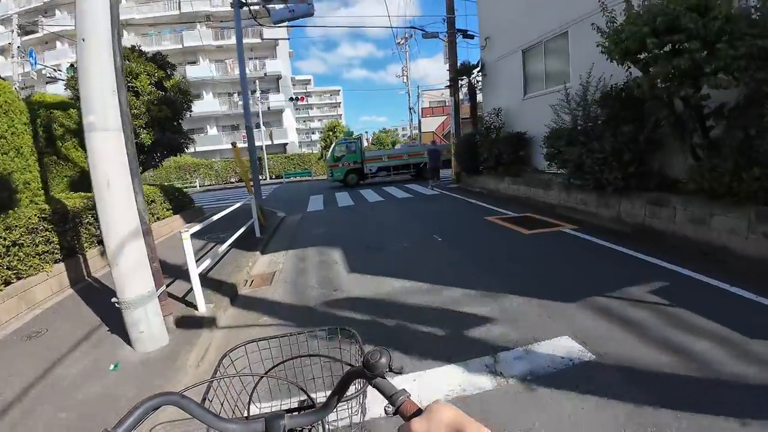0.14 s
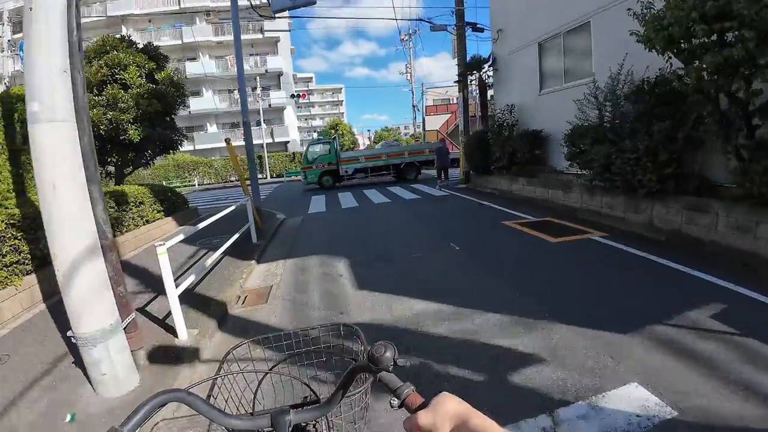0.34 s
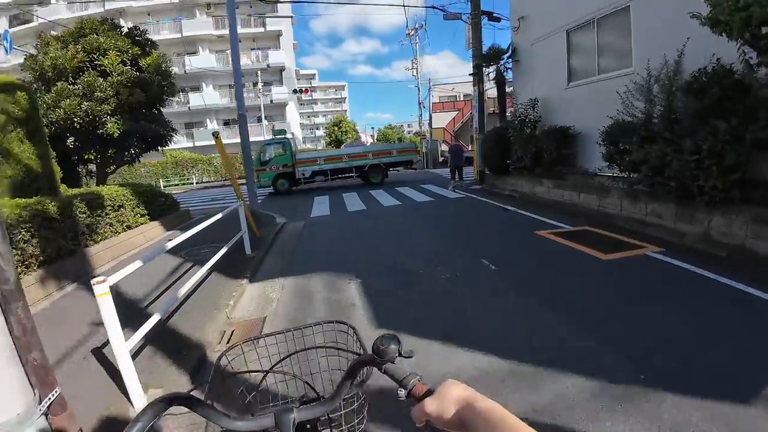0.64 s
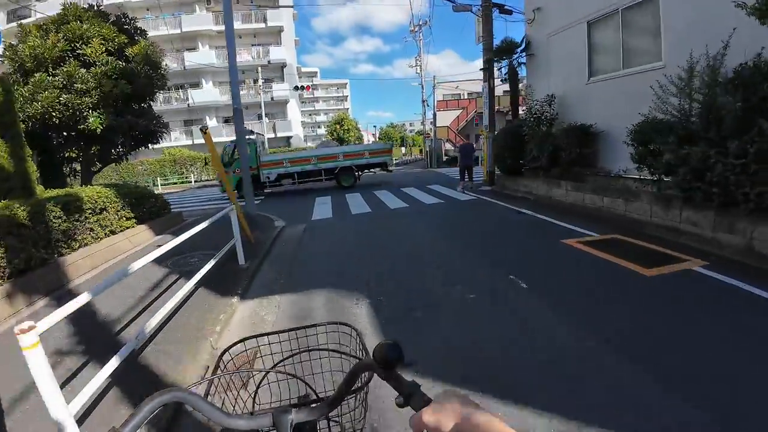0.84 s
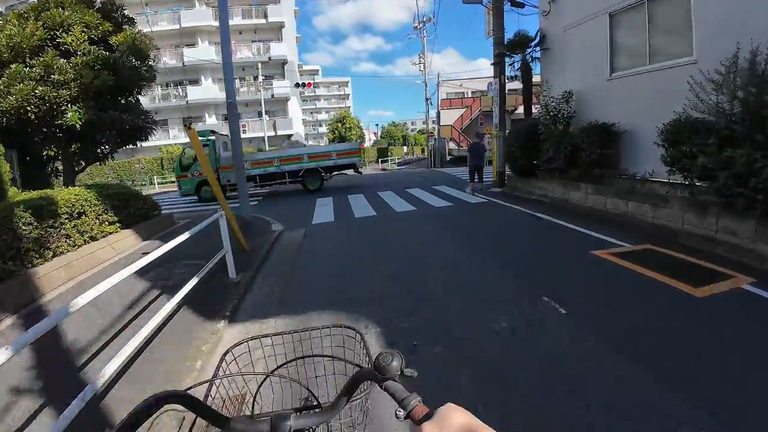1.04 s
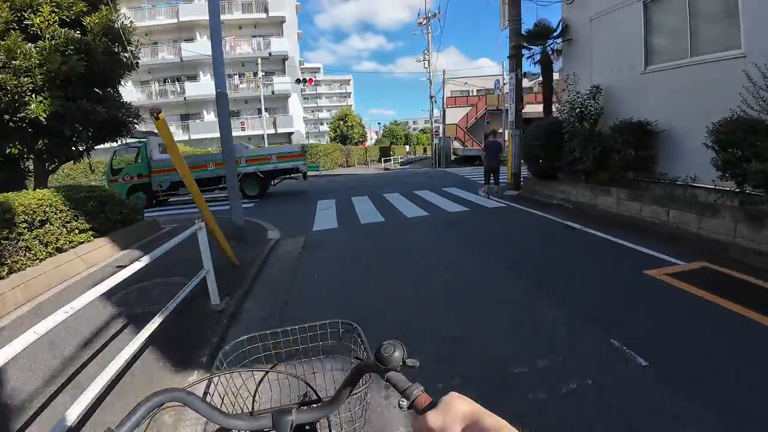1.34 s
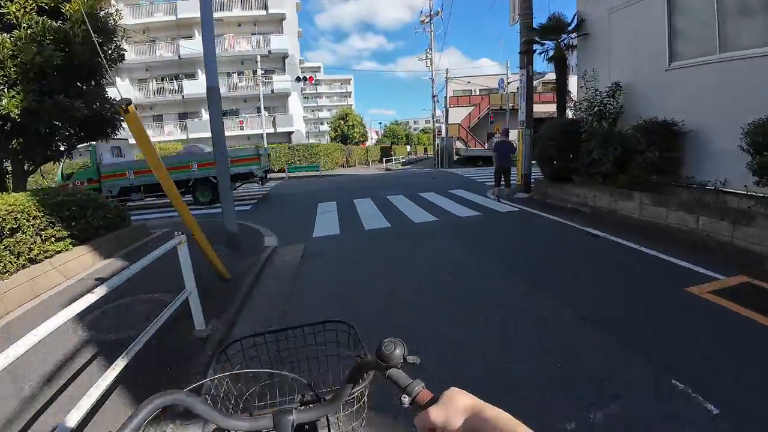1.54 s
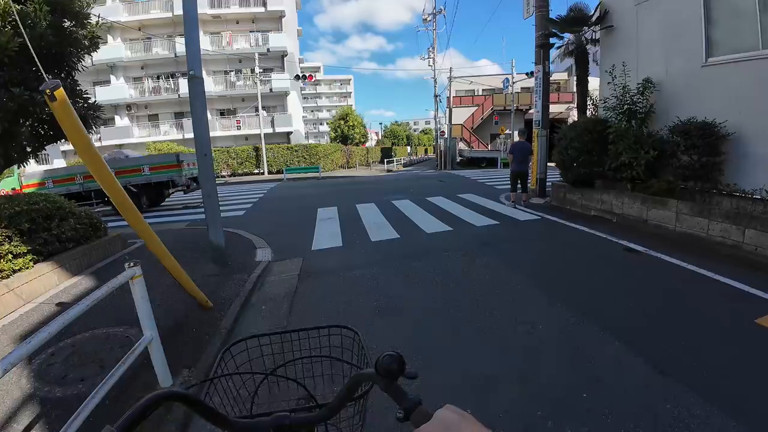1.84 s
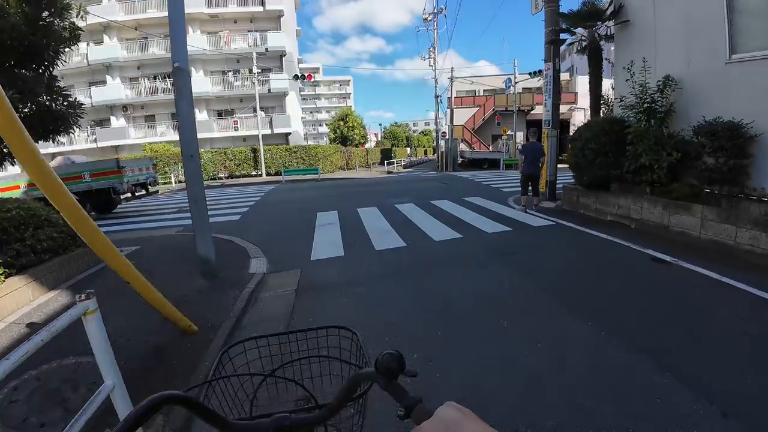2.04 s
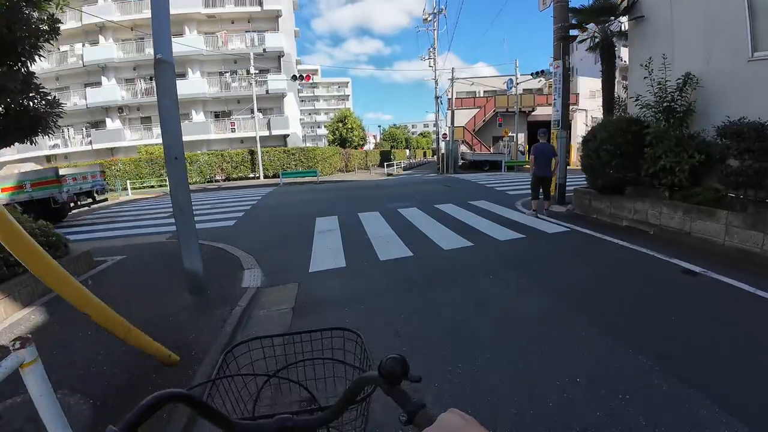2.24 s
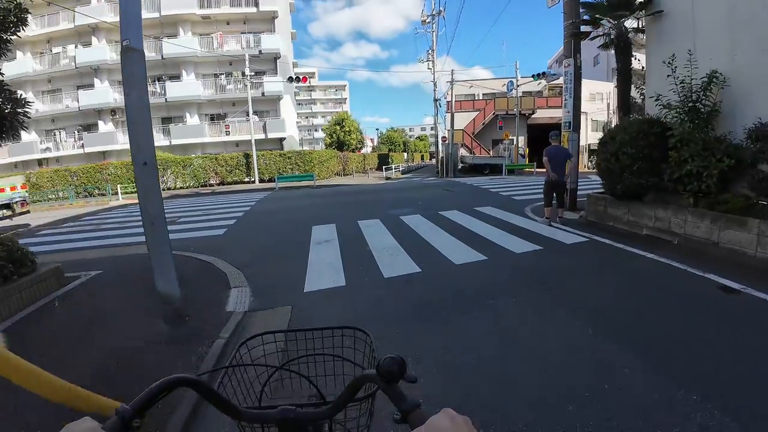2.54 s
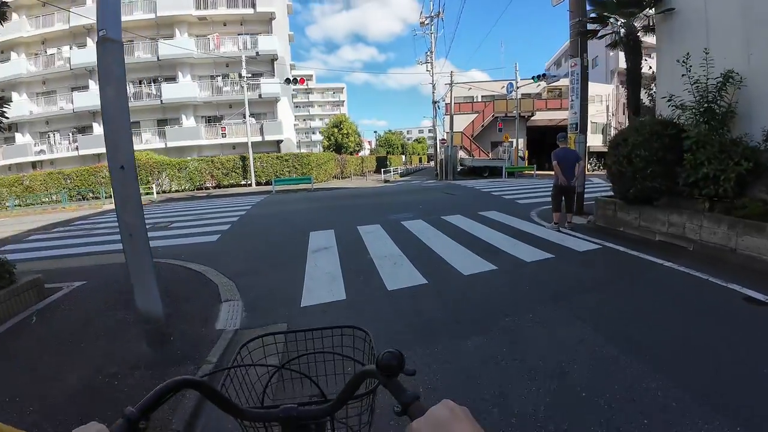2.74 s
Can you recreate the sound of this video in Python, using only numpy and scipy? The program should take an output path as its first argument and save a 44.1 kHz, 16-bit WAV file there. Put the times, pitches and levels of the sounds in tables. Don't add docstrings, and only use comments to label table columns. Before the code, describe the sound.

Bicycle brakes squeal close by: a fluttering, very high whistle from about 1.1 to 1.35 seconds, then a harder, louder one from 1.9 to 2.35 with a faint chirp near 2.45. A rough lower squeak at 2.5 to 2.65 ends the roll with a short metallic ring. Behind, a diesel truck drones and roars, strongest around 1 second, then recedes; tyres hiss softly, and house fronts echo the squeals.

```python
import sys
import numpy as np
from scipy import signal
from scipy.io import wavfile
from scipy.ndimage import uniform_filter1d

SR = 44100
rng = np.random.default_rng(int(sys.argv[2]) if len(sys.argv) > 2 else 0)


def ratio(d):
    e = np.asarray(d, float) / 20
    return 10 ** e


def put_to_file(sound):
    columns = np.atleast_2d(sound).T
    safe = np.clip(columns, -1, 1)
    whole_steps = np.round(safe * 32767)
    wavfile.write(sys.argv[1], SR, whole_steps.astype(np.int16))


N = 127890
T = np.arange(N) / SR


def evened(x):
    return x / np.sqrt(np.mean(x ** 2) + 1e-20)


def read(points, hz):
    f, value = np.transpose(points)
    return np.interp(np.log(hz + 1), np.log(f + 1), value, left=-70, right=-70)


def slow(rate_hz):
    width = max(int(SR / rate_hz / 2), 1)
    return evened(uniform_filter1d(uniform_filter1d(rng.standard_normal(N), width), width))


def resonate(x, hz, width):
    turn, r = np.exp(2j * np.pi * hz * T), np.exp(-np.pi * width / SR)
    return 2 * (turn * signal.lfilter([1 - r], [1, -r], x / turn)).real


def ringing(x, hz, width):
    return evened(resonate(resonate(x, hz, width), hz, width))


def gate(start, end, edge=0.0035):
    return np.sin(np.pi / 2 * np.clip(np.minimum(T - start + edge, end + edge - T) / edge, 0, 1)) ** 2


def noise(spectrum, patchy_db, flicker_db):
    frames, hz = N // 256 + 5, np.fft.rfftfreq(1024, 1 / SR)
    a, b, patches = rng.standard_normal((frames, 513, 3)).T
    patches = evened(uniform_filter1d(uniform_filter1d(patches, 10, 0), 12, 1))
    flicker = evened(uniform_filter1d(rng.standard_normal(frames), 3))
    level_db = read(spectrum, hz)[:, None] + patchy_db * patches + flicker_db * flicker
    return evened(signal.istft((a + 1j * b) * ratio(level_db), nperseg=1024, noverlap=768)[1][:N])


def engine():
    # t/s, firing rate f/Hz, then level/dB of orders 1, 3, 2, 5, 6
    revs = [(0.0, 38.47, -30, -47, -36, -41, -34.5), (0.15, 39.26, -32.5, -43, -46, -37, -44),
            (0.31, 39.95, -29.5, -39, -40, -41, -31.5), (0.52, 40.56, -42, -46, -39.5, -40, -39),
            (0.94, 42.66, -24, -32, -48, -39, -39), (0.99, 42.9, -24.5, -35, -59, -65, -48),
            (1.04, 42.6, -26, -36, -43, -27, -39.5), (1.21, 42.97, -26, -34, -40.5, -41, -37.5),
            (1.41, 43.68, -26, -32, -41, -28, -34), (1.68, 44.32, -25.5, -33.5, -31.5, -40, -40.5),
            (2.09, 45.02, -30, -35.5, -45, -40, -34.5), (2.27, 45.27, -34, -39.5, -41, -51, -57),
            (2.41, 45.7, -32.5, -44, -39, -32.5, -31.5), (2.72, 46.2, -33, -35, -48, -50, -37.5),
            (2.9, 47.3, -33, -34.5, -49, -39, -39)]
    # multiple of the firing rate, level/dB relative to the third order
    other_orders = [(4, -10), (7, -10.5), (8, -9), (9, -13), (10.5, -9)]
    s, hz, *levels_db = np.transpose(revs)
    turn = 2 * np.pi * np.cumsum(np.interp(T, s, hz)) / SR
    levels = [ratio(np.interp(T, s, db)) for db in levels_db]
    out = sum(level * np.sin(k * turn + k * k) for level, k in zip(levels, (1, 3, 2, 5, 6)))
    for k, under_db in other_orders:
        level = levels[1] * ratio(under_db + 1.35 * slow(2.9))
        out += level * np.sin(k * turn + 2 * np.pi * rng.random() + 0.6 * slow(5.8))
    return np.sqrt(2) * out


def traffic():
    # f/Hz, level/dB per Hz
    roar_near = [(29, -29), (50, -35), (97, -4.5), (412, -4.5), (827, -18.5), (1350, -15), (1630, -18.5),
                 (2560, -18), (4500, -32.5), (5850, -34), (9900, -120)]
    # f/Hz, level/dB per Hz
    roar_far = [(29, -28.5), (50, -15.5), (164, -5.5), (272, -2.5), (698, -12), (1630, -14), (1820, -16.5),
                (2760, -19.5), (4500, -30.5), (5850, -72), (9900, -120)]
    # f/Hz, width/Hz, level/dB
    treads = [(1320, 380, -38), (2700, 500, -43)]
    # t/s, share/0-1
    nearness = [(0, 0.49), (.4, 0.96), (.9, 1.), (1.3, 1), (1.7, 0.6), (2.1, 0.14), (2.5, 0.25),
                (2.9, 0.02)]
    # f/Hz, level/dB per Hz
    hiss_spectrum = [(2060, -59), (3500, 1.5), (4440, -8.5), (5920, -11), (7410, -13), (8250, -12),
                     (11500, -17), (13300, -10), (15600, -20)]
    near = np.clip(np.interp(T, *np.transpose(nearness)), 0, 1)
    tread = sum(ratio(db) * ringing(rng.standard_normal(N), hz, w) for hz, w, db in treads)
    close = ratio(-25.5) * noise(roar_near, patchy_db=1.0, flicker_db=.8) + tread
    far = ratio(-31.5) * noise(roar_far, patchy_db=0.5, flicker_db=0.3)
    stop_s, stopping_s = 2.6, 0.19
    stopped = np.clip((T - stop_s) / stopping_s, 0, 1)
    hiss_db = -42 - 5 * (1 - near) - 4.5 * stopped
    hiss = ratio(hiss_db) * noise(hiss_spectrum, patchy_db=1.2, flicker_db=.6)
    return np.sqrt(near) * close + np.sqrt(1 - near) * far + hiss


def whistles():
    # t/s, f/Hz, level/dB
    first_pull = [
        [(1.07, 8040, -40), (1.074, 7990, -22), (1.08, 7960, -22), (1.0845, 7940, -44), (1.097, 7945, -21),
         (1.105, 7945, -12), (1.113, 7950, -23), (1.12, 7950, -18), (1.1275, 7960, -44)],
        [(1.129, 7950, -30), (1.134, 7942, -18), (1.142, 7945, -19), (1.148, 7960, -29), (1.152, 7975, -20),
         (1.158, 7980, -27), (1.164, 7960, -20)],
        [(1.166, 7820, -13), (1.17, 7795, -11.5), (1.208, 7775, -12), (1.222, 7640, -17), (1.228, 7635, -13.5),
         (1.262, 7635, -14), (1.28, 7670, -25), (1.287, 7690, -34)],
        [(1.29, 7690, -27), (1.295, 7700, -24), (1.309, 7710, -36), (1.318, 7715, -22), (1.328, 7720, -38),
         (1.335, 7725, -29), (1.345, 7730, -44)],
    ]
    # t/s, f/Hz, level/dB
    second_pull = [
        [(1.914, 7930, -40), (1.924, 7815, -15), (1.942, 7790, -11.5), (1.964, 7830, -19), (1.98, 7820, -12.5),
         (2.074, 7806, -11.5), (2.118, 7780, -10), (2.15, 7715, -11.5)],
        [(2.153, 7650, -17), (2.19, 7650, -17), (2.2, 7635, -22), (2.222, 7755, -9.5), (2.258, 7775, -9.5),
         (2.267, 7712, -18), (2.285, 7702, -13), (2.298, 7710, -15), (2.312, 7712, -24)],
        [(2.314, 7714, -22), (2.325, 7716, -30), (2.334, 7734, -21), (2.345, 7740, -32), (2.36, 7745, -38)],
        [(2.446, 7595, -44), (2.46, 7560, -25), (2.48, 7620, -37)],
    ]
    out = np.zeros(N)
    wobble_hz, flutter_db, rough_db = 8 * slow(90), 1.3 * slow(100), 3.2 * slow(120)
    judder_db = 3 * slow(250) * gate(2.155, 2.215)
    beat = 2 * np.pi * 57.5 * (T - 2.047)
    twin_level = ratio(-13) * gate(1.99, 2.13, .03)
    free_hz = 7766
    for rows in first_pull + second_pull:
        s, hz, db = np.transpose(rows)
        pitch = np.interp(T, s, hz)
        turn = 2 * np.pi * np.cumsum(pitch + wobble_hz) / SR
        halves = ratio(-37) * np.sin(turn / 2) + ratio(-42) * np.sin(3 * turn / 2)
        halves *= gate(2.1, 2.3, .06)
        octave_db = -17 + 0.1155 * np.minimum(free_hz - pitch, 170) + rough_db
        if s[0] < 1.5:
            octave_db = octave_db - 9
        octave = ratio(octave_db) * np.sin(2 * turn)
        level = uniform_filter1d(np.interp(T, s, ratio(db)), size=150) * ratio(flutter_db + judder_db)
        tone = np.sin(turn) + twin_level * np.sin(turn + beat) + halves + level * octave
        out += np.sqrt(2) * gate(s[0], s[-1]) * level * tone
    return out


def chatter():
    # start t/s, length/s, level/dB, share of ringing/0-1
    scrapes = [
        (1.16, .035, -44, .1),
        (1.83, .05, -49, .3),
        (1.915, .025, -42, .1),
        (2.15, .08, -39, .7),
        (2.405, .03, -51, .3),
        (2.53, .06, -44, .2),
        (2.592, .05, -40, .3),
    ]
    # f/Hz, width/Hz, level/dB
    frame_modes = [(2700, 150, 0), (4800, 90, -2), (6000, 250, -12), (7100, 80, -4), (9600, 400, 0),
                   (10500, 400, -3), (13600, 350, -3)]
    grit = rng.standard_normal(N) * ratio(3.0 * slow(150))
    ring = evened(sum(ratio(db) * ringing(grit, hz, w) for hz, w, db in frame_modes))
    bare = evened(resonate(grit, 6000, 9000))
    out = np.zeros(N)
    for s, length, db, share in scrapes:
        swell = gate(s + .3 * length, s + .7 * length, .3 * length)
        out += ratio(db) * swell * (share * ring + (1 - share) * bare)
    return out


def streaks():
    # start t/s, length/s, f/Hz, width/Hz, level/dB
    narrow_bands = [(2.3, .1, 12600, 50, -54), (2.305, .05, 9900, 80, -53), (2.3, .04, 10500, 80, -53),
                    (2.408, .016, 11000, 3000, -49), (2.35, .012, 12000, 2500, -51),
                    (2.165, .06, 10000, 1500, -47), (2.16, .06, 4800, 70, -53), (2.165, .05, 5900, 200, -51),
                    (2.15, .07, 15300, 250, -40), (2.59, .03, 14600, 200, -46), (2.595, .03, 13200, 350, -43),
                    (2.62, .04, 2150, 150, -36), (1.19, .13, 15400, 250, -47), (2.47, .12, 7750, 150, -43),
                    (1.4, .25, 7900, 200, -49), (1.93, .24, 15620, 150, -44), (2.62, .1, 3350, 350, -38),
                    (2.53, .05, 10150, 300, -43), (2.63, .06, 13400, 300, -45)]
    grit = rng.standard_normal(N)
    out = np.zeros(N)
    for s, length, hz, w, db in narrow_bands:
        swell = gate(s + 0.28 * length, s + 0.67 * length, .25 * length)
        out += ratio(db) * swell * ringing(grit, hz, w)
    return out


def squeaks():
    # t/s, f/Hz, overtone level/dB, fundamental level/dB
    slips = [
        [(2.529, 1790, -32, -30), (2.538, 1705, -20, -31), (2.546, 1690, -29, -30), (2.553, 1690, -21, -31),
         (2.568, 1676, -24, -30), (2.583, 1700, -31, -28)],
        [(2.588, 1725, -25, -31), (2.599, 1665, -16, -27), (2.604, 1630, -27, -24), (2.61, 1590, -13.5, -19),
         (2.6135, 1620, -22, -19), (2.616, 1710, -10.5, -22), (2.621, 1615, -20, -28), (2.634, 1605, -28, -26),
         (2.665, 1625, -42, -38)],
        [(2.705, 1700, -44, -42), (2.717, 1710, -36, -33), (2.73, 1690, -44, -42)],
    ]
    # multiple of the pitch, level/dB; the first has its own level in the slips
    partials = [(1, -4), (2, 0), (3, -17), (4, -20.5), (5, -25), (6, -24), (7, -35), (8, -27.5), (9, -37)]
    out, jitter = np.zeros(N), 1 + .016 * slow(900)
    overtones = [(k, ratio(db + 2.5 * slow(140))) for k, db in partials[1:]]
    shiver_db = 2.5 * slow(160)
    for rows in slips:
        s, hz, db, low_db = np.transpose(rows)
        turn = 2 * np.pi * np.cumsum(np.interp(T, s, hz) * jitter) / SR
        stack = sum(level * np.sin(round(k) * turn + k * k) for k, level in overtones)
        fundamental = ratio(np.interp(T, s, low_db) + shiver_db) * np.sin(turn)
        out += np.sqrt(2) * gate(s[0], s[-1]) * (ratio(np.interp(T, s, db)) * stack + fundamental)
    return out


def knock():
    # f/Hz, width/Hz, level/dB, T60/s
    lock_modes = [(2137, 139.5, -30.5, 0.25), (6600, 200, -44, 0.64), (8230, 400, -40, .4),
                  (10000, 300, -42, 0.39), (13350, 400, -41.5, 0.39), (12500, 2500, -44.5, .4),
                  (2715, 120, -43, 0.32), (4900, 260, -47, 0.25)]
    lock_s = 2.62
    after = np.maximum(T - lock_s, 0)
    rings = sum(ringing(rng.standard_normal(N), hz, w) * ratio(db - 60 * after / t60)
                for hz, w, db, t60 in lock_modes)
    return rings * gate(lock_s, 3, 0.00699)


def street(x):
    # delay t/s, level/dB
    fronts = [(.011, -24), (.023, -25), (.047, -24)]
    tail_db, t60_s = -19, 0.86
    taps = np.zeros(SR)
    at = np.arange(800, SR - 20, 20)
    taps[at + rng.integers(0, 20, len(at))] = rng.choice([-1., 1.], len(at))
    taps *= ratio(-60 * T[:SR] / t60_s)
    taps *= ratio(tail_db) / np.linalg.norm(taps)
    taps[0] = 1
    for s, db in fronts:
        taps[round(s * SR)] += ratio(db)
    return signal.fftconvolve(x, taps / np.linalg.norm(taps))[:N]


def scene():
    low, wet = squeaks(), 0.61
    brakes = whistles() + wet * low + knock() + chatter() + streaks()
    return (street(brakes) + (1 - wet) * low + engine() + traffic())[None]


def top_cut(x):
    return signal.sosfilt(signal.butter(12, 15760, fs=SR, output="sos"), x)


def record(dry):
    return top_cut(dry)


dry = scene()
out = record(dry)
put_to_file(out)
```